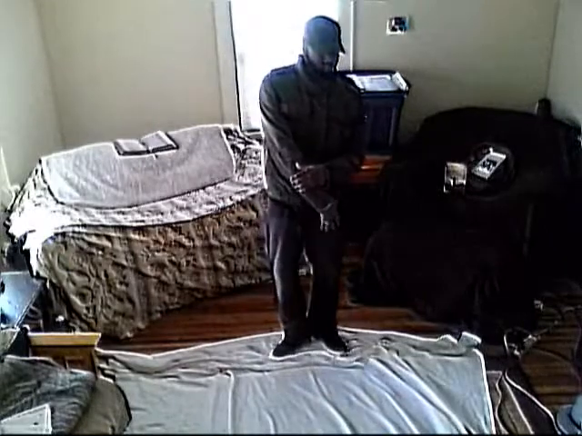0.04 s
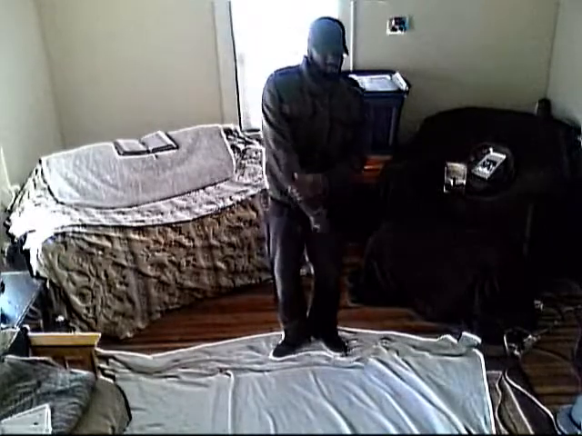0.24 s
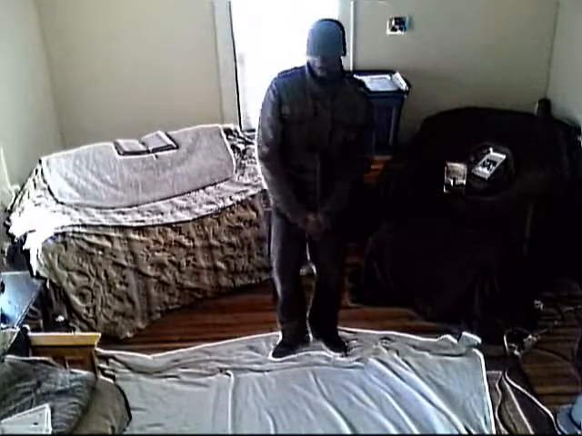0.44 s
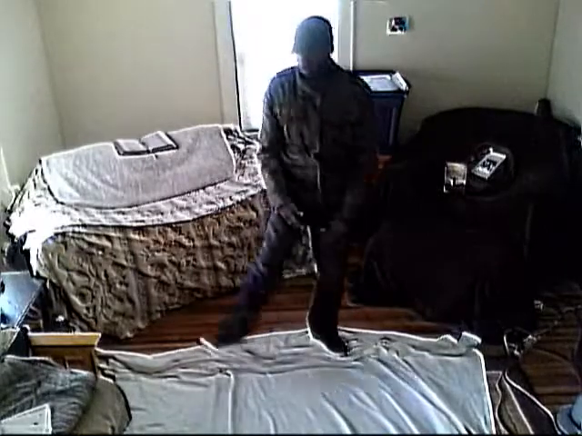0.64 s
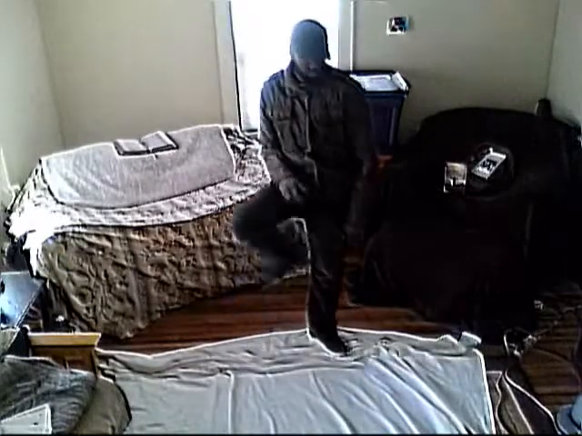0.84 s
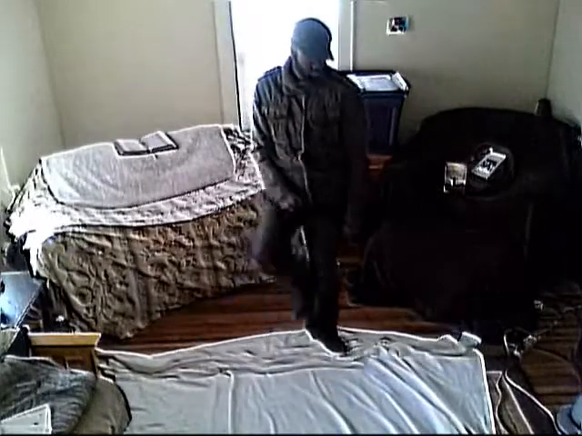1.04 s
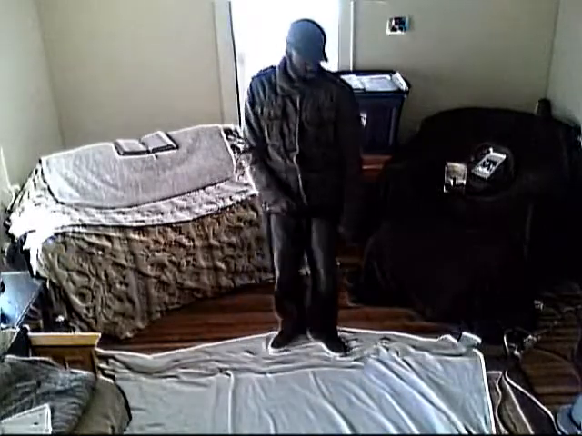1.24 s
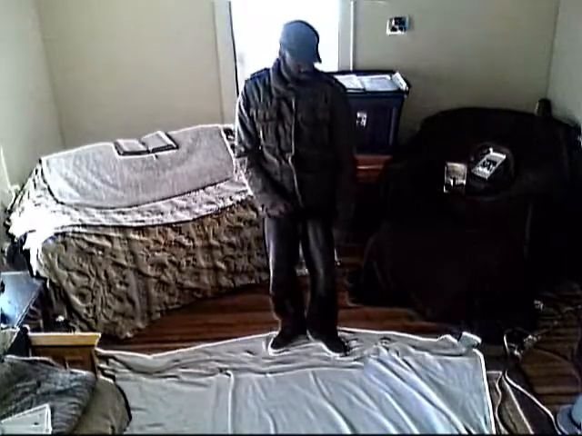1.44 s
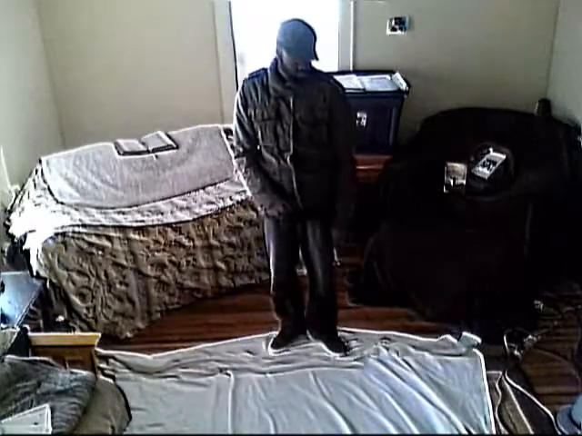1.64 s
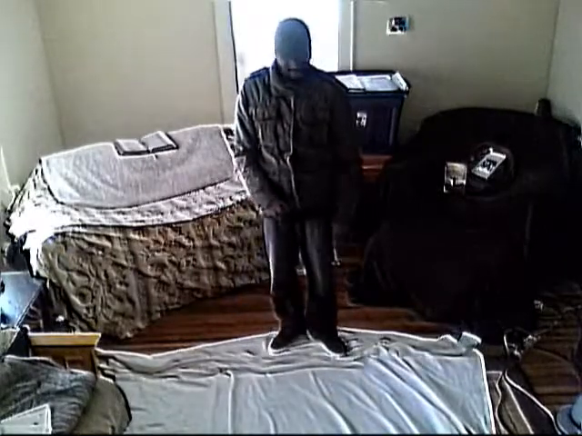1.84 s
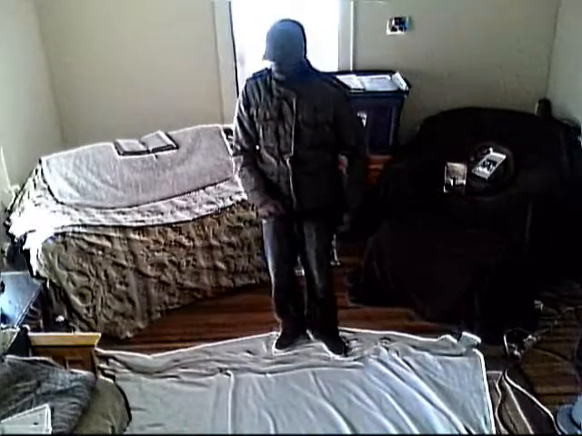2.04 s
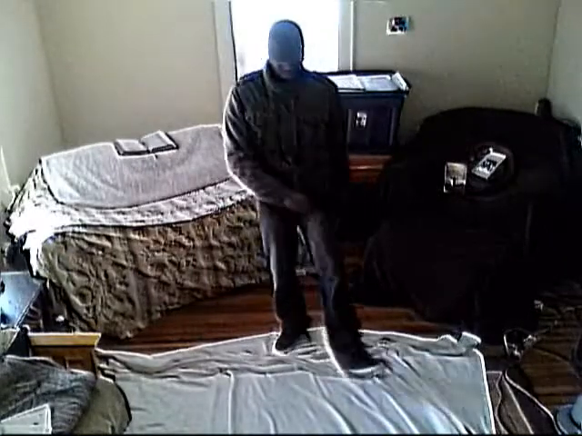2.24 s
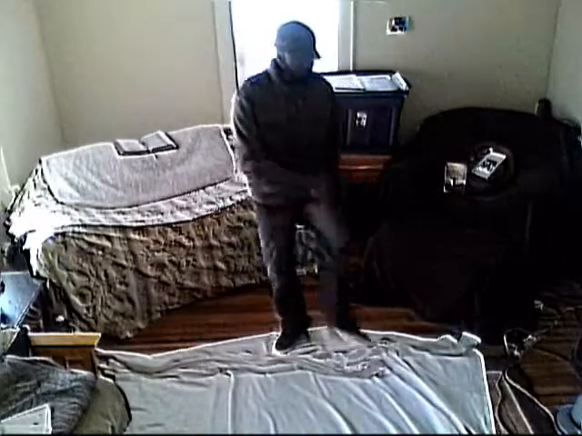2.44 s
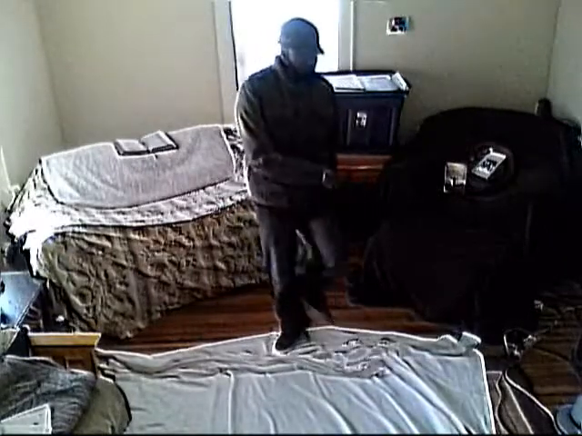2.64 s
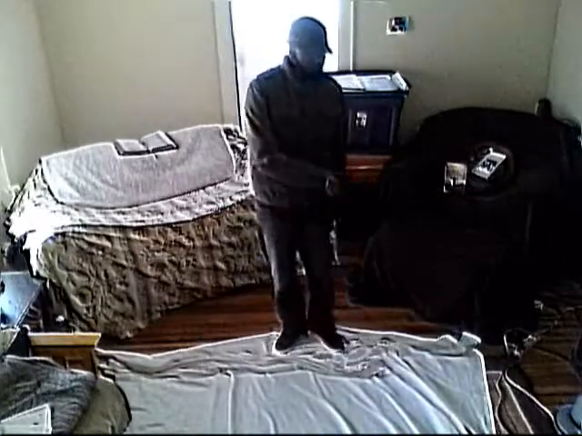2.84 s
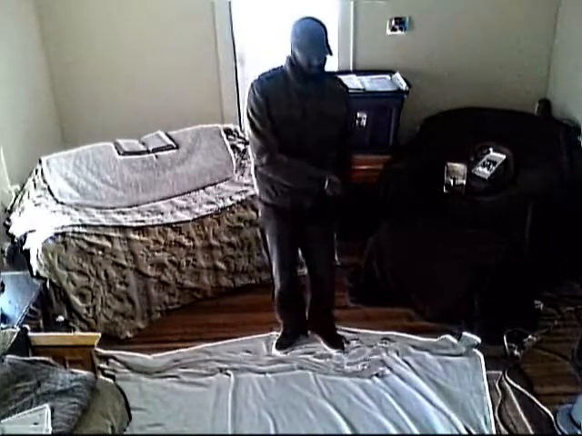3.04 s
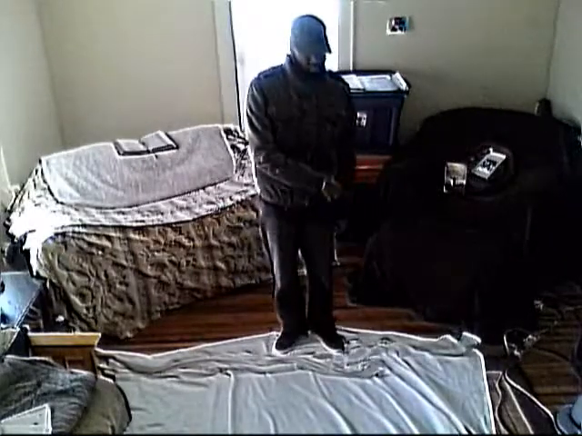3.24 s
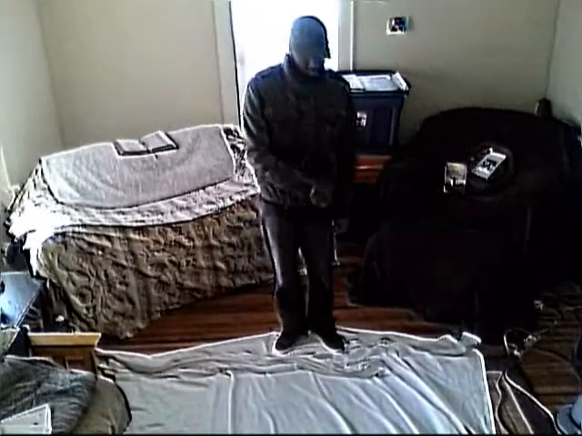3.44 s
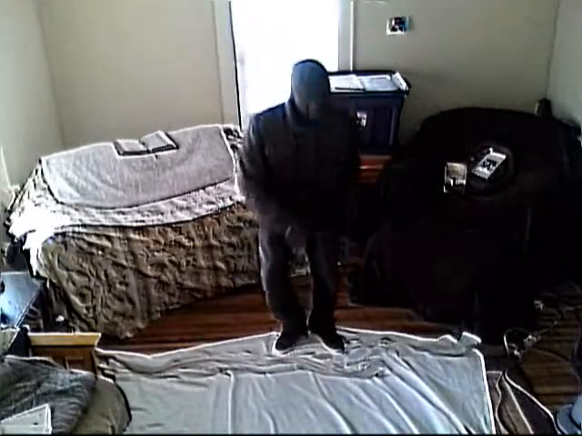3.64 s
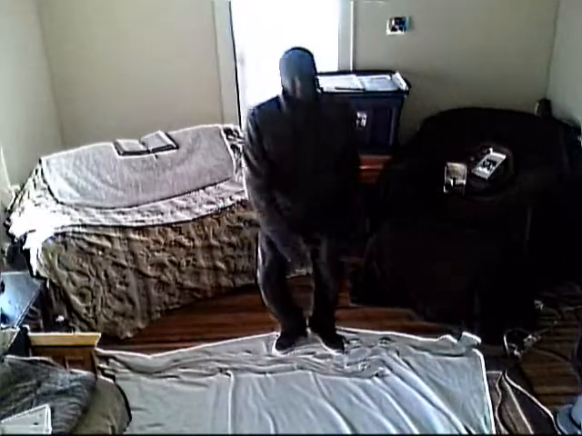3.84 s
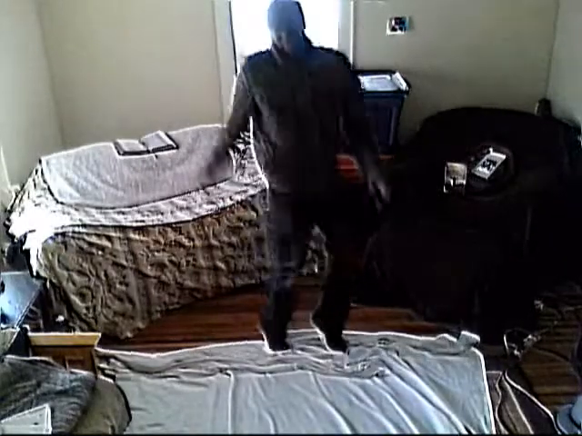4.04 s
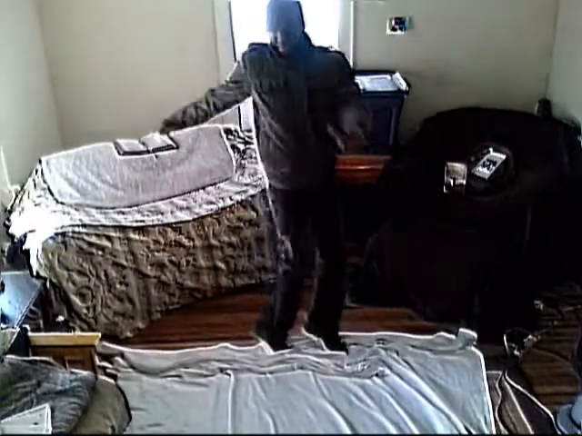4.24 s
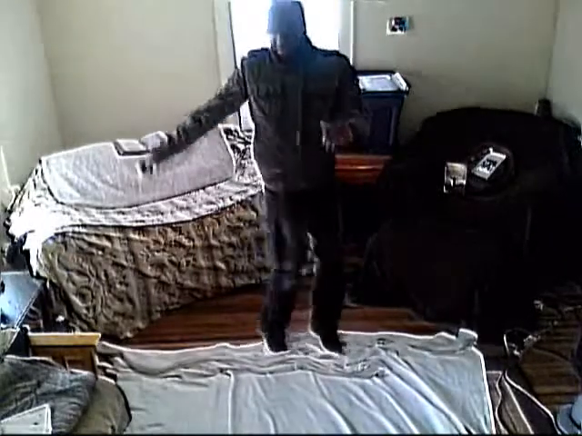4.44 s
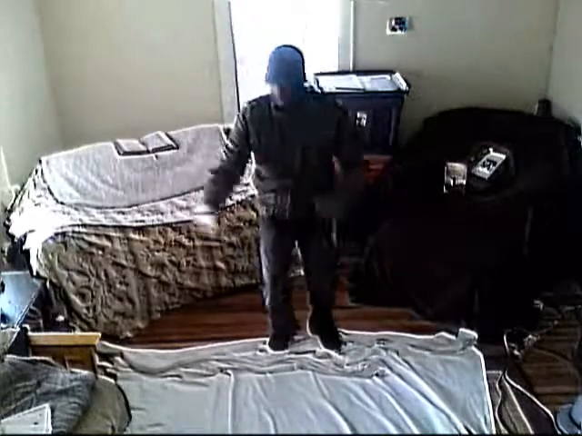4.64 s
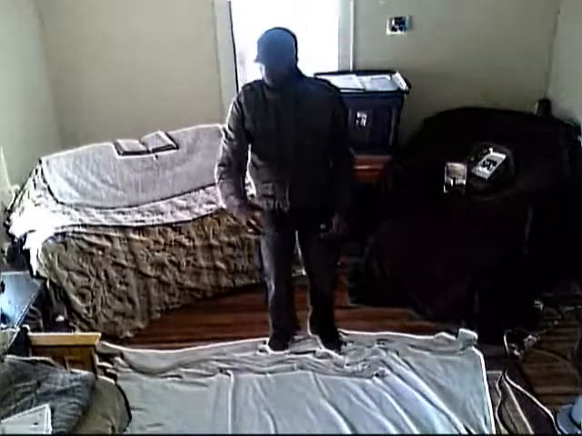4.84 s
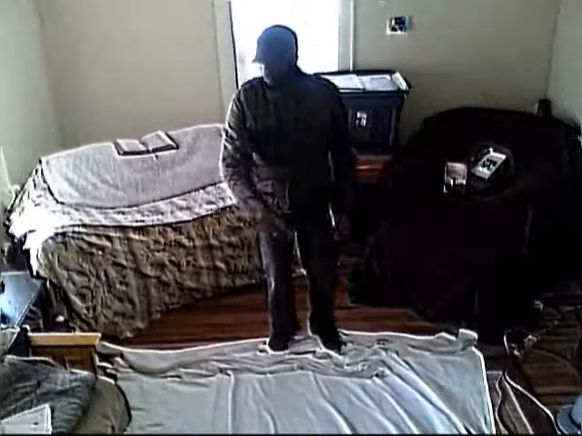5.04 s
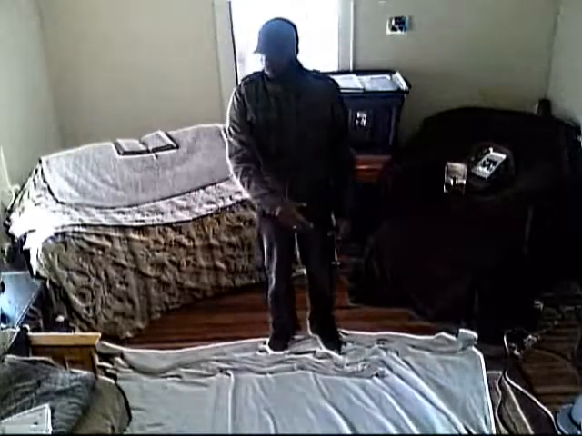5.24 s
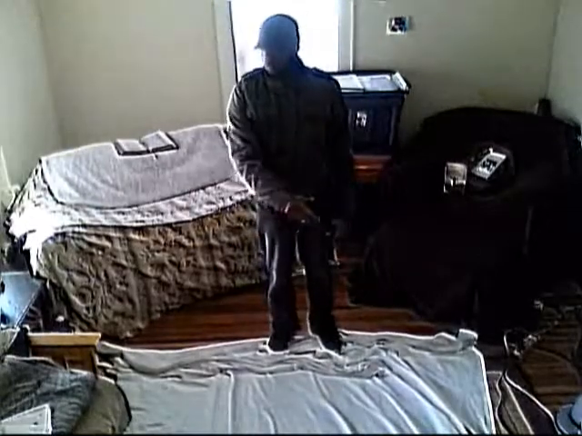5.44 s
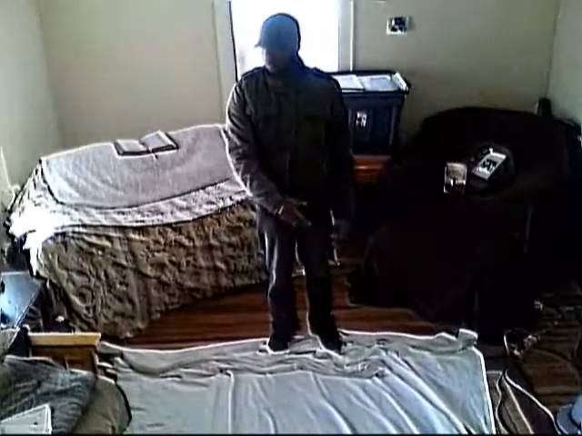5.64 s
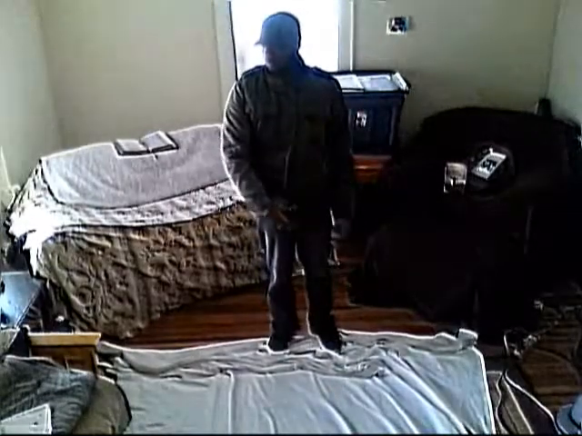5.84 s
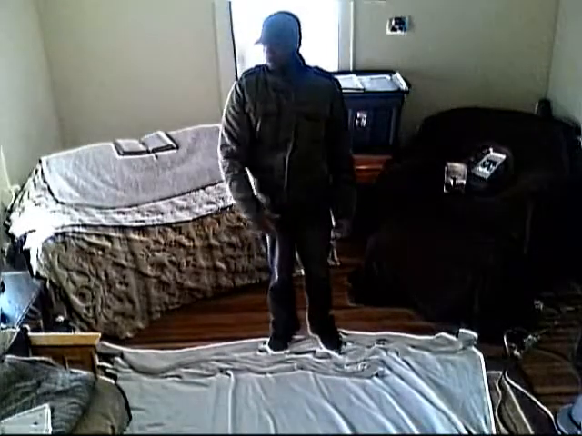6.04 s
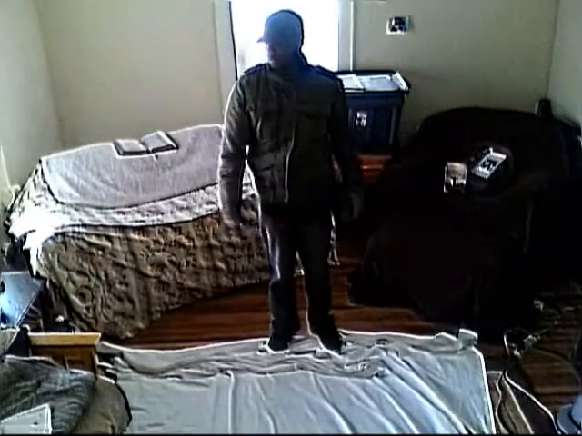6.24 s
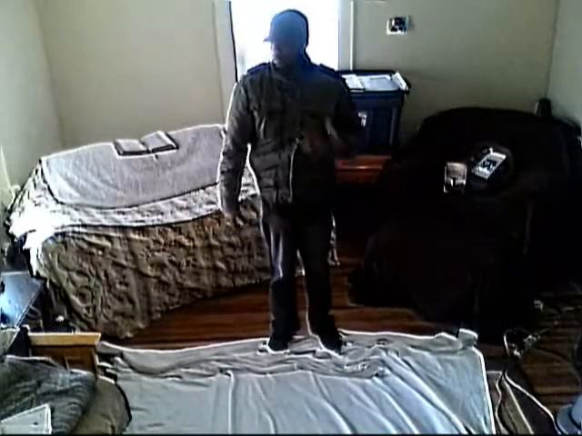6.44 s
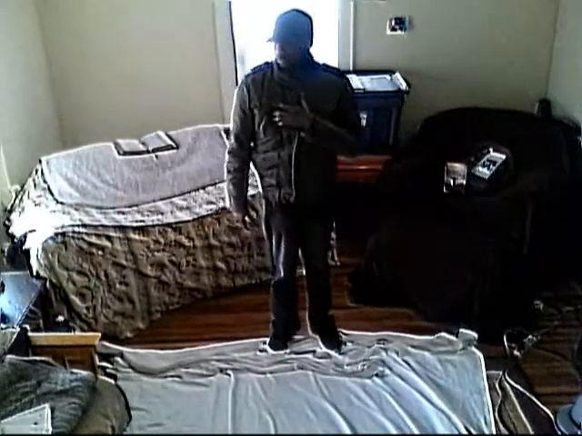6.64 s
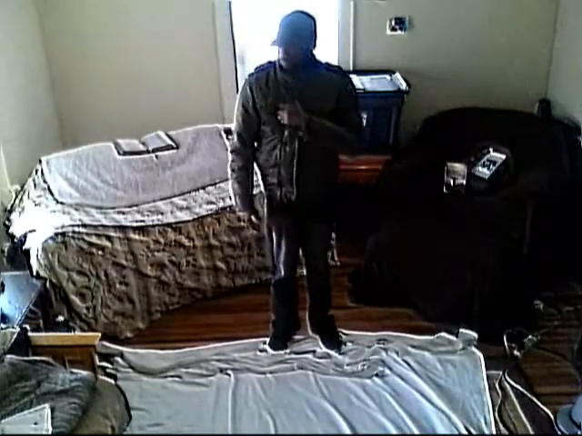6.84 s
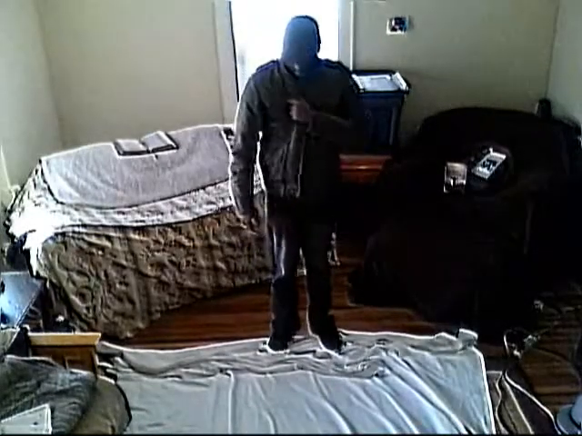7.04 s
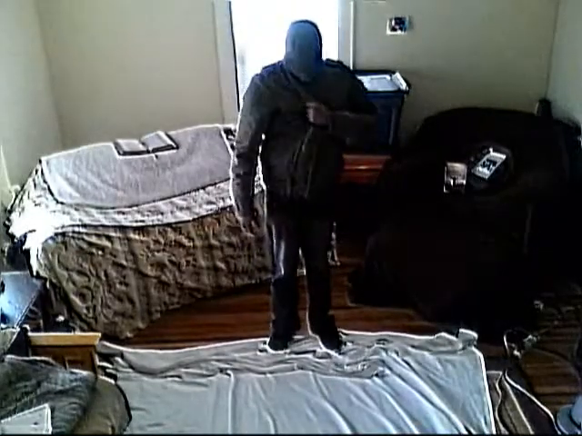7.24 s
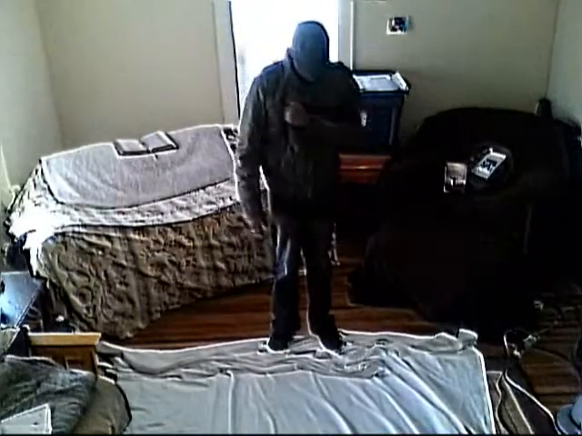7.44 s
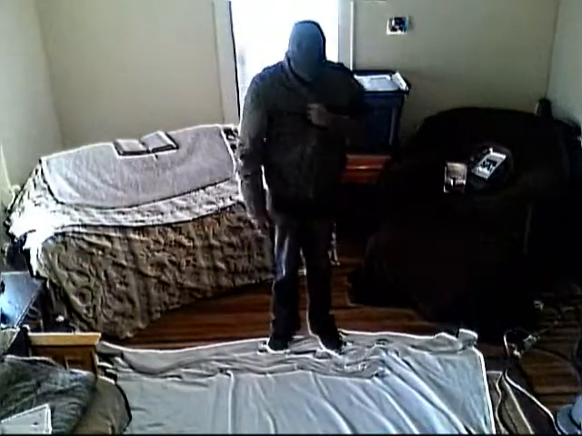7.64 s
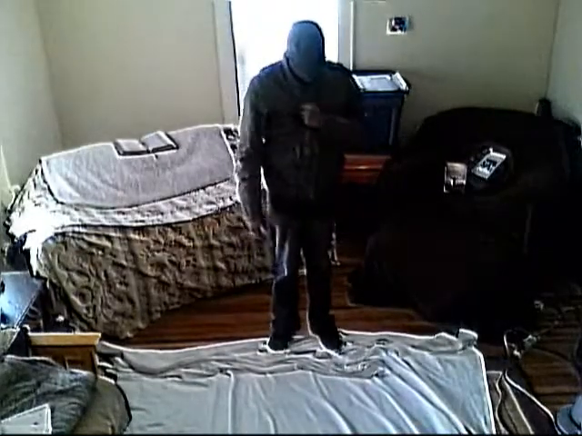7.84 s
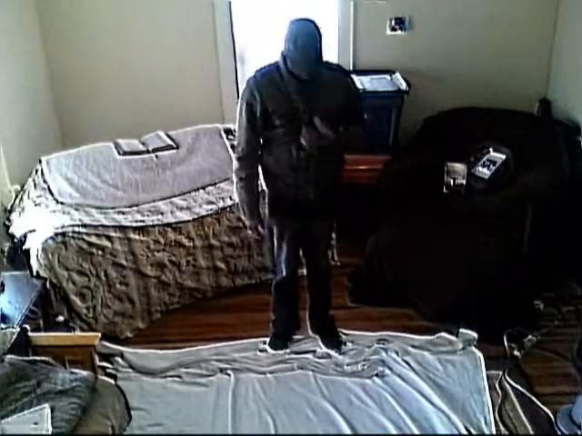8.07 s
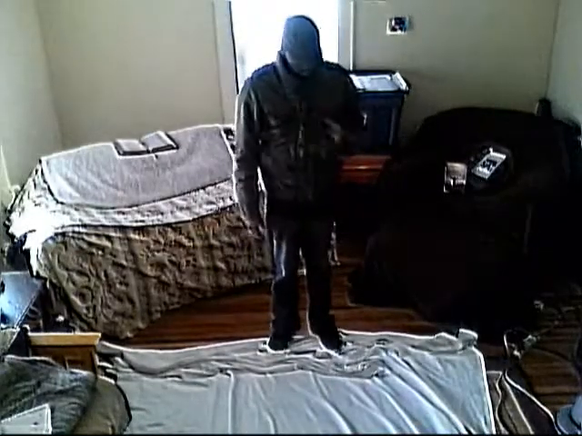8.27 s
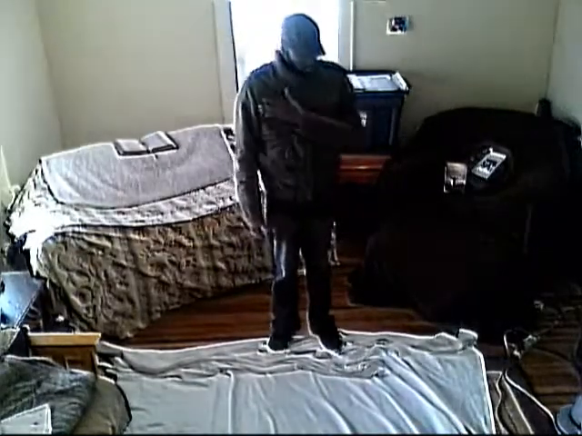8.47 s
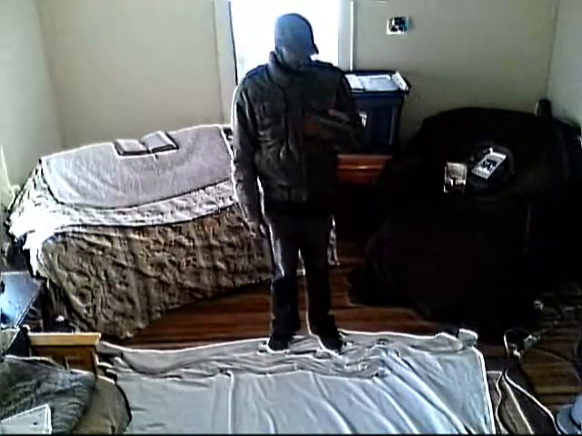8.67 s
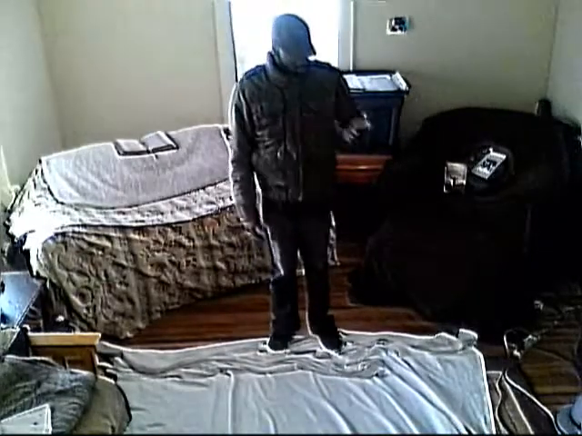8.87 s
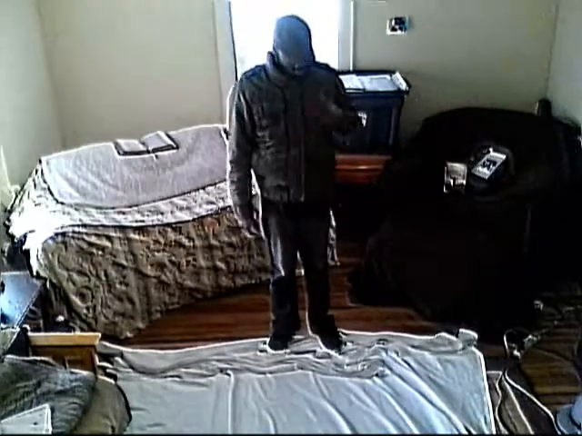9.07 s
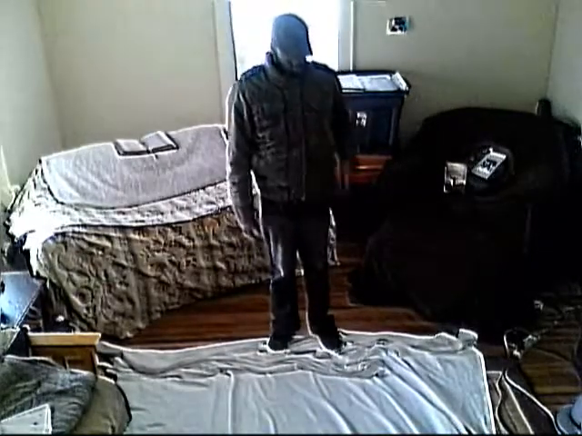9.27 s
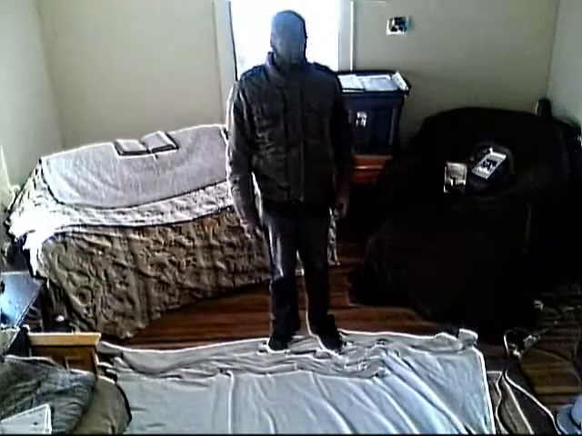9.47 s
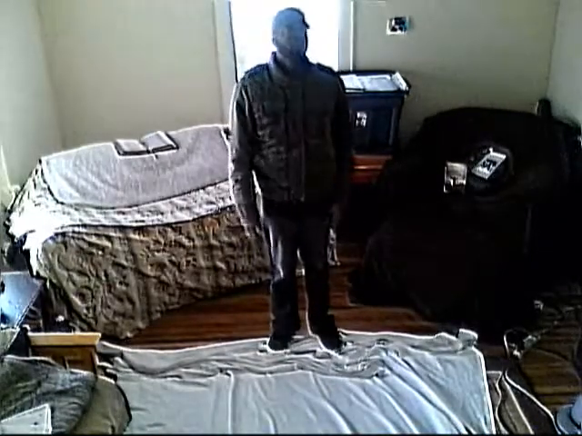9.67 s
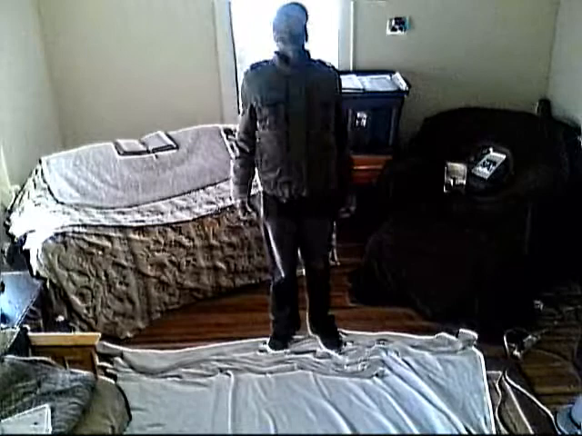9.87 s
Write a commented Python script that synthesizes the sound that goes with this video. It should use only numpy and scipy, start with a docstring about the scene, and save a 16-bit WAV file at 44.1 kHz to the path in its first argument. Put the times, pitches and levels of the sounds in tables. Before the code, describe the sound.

A small bedroom with a quiet, steady fan: low rumble, faint hum and wavering airy whir. At the start an earlier stomp fades in low floor tones; clothes swish softly from 0.4 s, with a faint jacket pat near 0.8 s. At 1.2 s a foot stomps on the sheet-covered wooden floor: a huge deep thud, quick boomy knocks and a loose board ringing briefly. Soft bumps and rustles follow, and a dull pat at 2.5 s. At 2.8 s comes a lower, softer stomp. Cloth sweeps around 3.9-4.2 s, then the hardest landing at 4.6 s, with a sharp shoe clack and a deep, overloaded boom decaying into rumble. Afterwards there are only slight floor bumps and rustling. Muffled jacket pats come at 6.3, 6.8-6.9 and 7.7 s, then crisp, snapping slaps at 8.5 and 9.0 s, the latter with a fuller chest thud. A faint swish ends it near 9.9 s.

```python
"""An earlier stomp dies away while a small fan whirs and clothes swish; a light pat on the jacket follows.
Then a dancer stomps three times on a sheet-covered wooden floor in a small bedroom, and pats and slaps his jacket.
Stomps are decaying floor tones plus shaped noise; slaps are noise bursts plus chest, room and cloth tones.
Clothes are noise that swells with each movement; shifts of weight bump the floor; the fan is steady noise and hum.
The nearby microphone overloads on the heaviest heaves, which flattens the wave."""
import sys
import numpy as np
from scipy import signal
from scipy.fft import rfft, irfft, next_fast_len
from scipy.io import wavfile
from scipy.ndimage import uniform_filter1d

SR = 44100
rng = np.random.default_rng(int(sys.argv[2]) if len(sys.argv) > 2 else 0)


def persist_wave(psi):
    """Save psi, clipped to +-1, as 16-bit WAV."""
    counts = np.round(np.clip(psi, -1, 1) * 32767).astype(np.int16)
    wavfile.write(sys.argv[1], SR, np.atleast_2d(counts).T)


N = 437031
TIME = np.arange(N) / SR
TAIL = TIME[:SR]   # one second, the length of each single sound
CUTOFF_HZ = 15600   # top of the sound
# how much the tones vary from blow to blow
CRACK_SPREAD_DB, JOIST_SPREAD_DB, MODE_SPREAD_DB = 1.0, 1.5, 3.0


# In all tables t60 is the time a tone takes to fall by 60 dB.
# Contacts of heel, sole and body weight: (time [s], heave of the joists [dB], their pitch under load [ratio],
# boom of the boards [dB], top of the boom, higher when harder [Hz], clack of the shoe [dB],
# ring of the loose board [dB], damping by the planted foot, none if negative [dB per s])
STOMP_CONTACTS = [(1.2315, 10, 0.96, -20.5, 348, -42.5, -43, 3.5),
                  (1.240, -23, 0.92, -16.5, 290, -46, -28, 58.5),
                  (1.2577, -7, 0.92, -11.5, 380, -46.5, -18.5, 70),
                  (1.277, -22, 0.77, -15.5, 280, -55.5, -17.5, 48),
                  (1.293, -22.5, 1, -15.5, 250, -60, -31, 68.5),
                  (1.3187, 0.5, 0.95, -14, 290, -43, -17, 70), (1.356, -22, 1, -21, 230, -51, -28.5, 39.5),
                  (1.415, -12, 0.9, -19.5, 170, -51, -32, -3), (1.572, -27, 0.9, -35, 300, -71, -46, -5),
                  (2.805, 0, 0.79, -20, 200, -43, -50, 20), (2.8126, -23, 0.72, -18, 200, -45, -50, 13),
                  (2.828, -10, 1, -27, 200, -56, -50, 22), (2.849, 1, 0.94, -21, 216, -64, -48, 28),
                  (2.877, -9, 0.93, -20, 216, -68, -45, -2),
                  (4.6051, 10.5, 0.93, -17.5, 450, -34.5, -40, 6),
                  (4.6144, -26, 1, -15.5, 450, -30.5, -36, 12),
                  (4.632, -13, 0.62, -15.5, 450, -32.5, -29, 5),
                  (4.655, -21, 0.9, -19.5, 400, -35, -36, 12), (4.693, -10, 0.52, -18.5, 340, -41, -31, 0),
                  (4.785, -22, 0.62, -24.5, 300, -46, -50, 0),
                  (4.882, -14.5, 0.19, -30.5, 600, -63, -50, 0)]
# Lowest bending tones of the floor, before the load retunes them: (pitch [Hz], level [dB], t60 [s])
JOIST_MODES = [(23.94, -8.5, 0.49), (32.85, 5, 0.21), (38.7, -25, 1), (51.7, -9, 0.31)]
# Tones of boards and room: (pitch [Hz], relative level [dB], t60 [s])
BOARD_MODES = [(88.8, -2, 0.32), (100.54, -9, 0.71), (115.5, -6.5, 0.46), (154.3, -11, 0.46),
               (168, -19, 0.28), (235.5, -10.5, 0.56), (284.9, -5, 0.41), (311, -14, 0.49),
               (357.5, -16, 0.62), (515, -25.5, 0.36), (686, -26, 0.62)]
# Dense ringing of the floor: (frequency [Hz], relative level [dB per Hz])
BOOM_SPECTRUM = [(30, -12), (70, -3.5), (150, -6), (300, -9.5), (400, -16), (600, -28), (1200, -52.5),
                 (4000, -61), (15000, -68)]
# Dense ringing of the shoe: (frequency [Hz], relative level [dB per Hz])
CLACK_SPECTRUM = [(100, -27), (400, 13.5), (800, 6), (1300, 7.5), (2200, -13), (2900, -31), (6000, -36),
                  (15000, -58)]
# Ringing of a struck board: (pitch [Hz], relative level [dB], t60 [s])
KNOCK_MODES = [(491, -3, 0.19), (990, 10.5, 0.04), (1197, -15.5, 0.22), (1290, -12, 0.14), (1370, -8, 0.35),
               (1960, -17, 0.28), (2100, -8, 0.094)]
# One board that rings on when the foot lands on it: (pitch [Hz], relative level [dB], t60 [s])
LOOSE_BOARD_MODES = [(198.3, -1, 0.3), (289.5, -7.5, 0.32)]


def stomps(modes_db=-5.0, dense_db=-8.5, press_s=0.021, sole_s=0.00031, knock_db=-5.0, loose_s=0.004):
    """Each contact of a landing bends the joists, rings the boards and clacks through the sheet."""
    out = np.zeros(N)
    for s, heave_db, tuning, boom_db, top_hz, clack_db, loose_db, damping_db in STOMP_CONTACTS:
        heave = ring(JOIST_MODES, JOIST_SPREAD_DB, tuning) * (1 - np.exp(-TAIL / press_s)) ** 2

        dense = coloured(impact(direct_db=12.5, contact_s=0.0045, build_s=0.0021), BOOM_SPECTRUM)
        boom = from_db(modes_db) * ring(BOARD_MODES, MODE_SPREAD_DB) + from_db(dense_db) * dense
        boom = boom * (1 - np.exp(-TAIL / sole_s))   # the soft sole rounds the attack
        boom = low_pass(boom, 1, top_hz)

        clack = coloured(impact(direct_db=2.0, contact_s=0.0083, build_s=0.011), CLACK_SPECTRUM)
        clack += from_db(knock_db) * ring(KNOCK_MODES, MODE_SPREAD_DB)

        floor = from_db(heave_db) * heave + from_db(boom_db) * boom + from_db(clack_db) * clack
        damping = from_db(-max(damping_db, 0) * TAIL)
        loose = ring(LOOSE_BOARD_MODES, JOIST_SPREAD_DB) * (1 - np.exp(-TAIL / loose_s))
        add(out, s, floor * damping + from_db(loose_db) * loose)
    return out


# Short dry ticks and clicks of boards, shoe, cloth, light pats and microphone overload:
# (time [s], level [dB], centre [Hz], fall to both sides [dB per octave])
DRY_TICKS = [(1.238, -36.5, 2000, 54.5), (1.243, -43.5, 3300, 22.5), (1.2596, -27.5, 800, 19),
             (2.805, -36, 2300, 17), (4.609, -35, 2040, 57), (4.616, -25.5, 1050, 28),
             (4.697, -46, 4200, 20), (6.7095, -44, 2460, 55), (6.708, -41, 4660, 36),
             (6.937, -35, 1190, 13.5)]


def ticks(decay_s=0.0023):
    """Short dry ticks and clicks: brief noise bursts, each narrowed around its own centre."""
    out = np.zeros(N)
    for s, db, centre_hz, focus_db in DRY_TICKS:
        burst = rng.standard_normal(SR) * np.exp(-TAIL / decay_s)
        spectrum = focused([(centre_hz, 0)], centre_hz, focus_db, flat_octaves=0.038)
        add(out, s, from_db(db) * coloured(burst, spectrum))
    return out


# Hand on jacket: (time [s], thud of the chest [dB], snap of the cloth before a common 2 dB cut [dB],
# centre of the snap [Hz], its fall to both sides [dB per octave], shaking of the jacket [dB])
JACKET_SLAPS = [(0.83, -48.5, -70, 700, 9, -62), (2.472, -44, -53, 515, 26, -60),
                (6.262, -60.5, -52.5, 1670, 53, -75), (6.757, -50, -45, 800, 42, -76),
                (6.800, -46.5, -47, 378, 30, -70), (6.817, -40.5, -40, 600, 12, -56),
                (6.829, -42.5, -47, 1500, 24, -68), (6.9361, -52, -37.5, 1390, 30, -62),
                (7.659, -41.5, -35.5, 930, 12, -75), (8.4726, -50, -45, 1300, 14, -55),
                (8.4756, -49, -23.5, 3400, 4, -30), (8.4815, -37, -27.5, 1900, 16.5, -35),
                (9.0108, -38, -31.5, 900, 11, -59), (9.0173, -23.5, -23, 2300, 2, -34),
                (9.0253, -29, -28.5, 900, -1, -46)]
# Dense sound of the chest: (frequency [Hz], relative level [dB per Hz])
CHEST_SPECTRUM = [(25, -10), (110, -2.5), (180, -6.5), (330, -3.5), (500, -3.5), (700, -4.5), (1100, -15.5),
                  (1700, -27), (3000, -26.5), (15000, -75)]
# Snap of the cloth, before it is narrowed: (frequency [Hz], relative level [dB per Hz])
SNAP_SPECTRUM = [(150, -30), (600, 7), (1700, 5.5), (2500, -2.5), (3300, -8), (5000, -8.5), (6500, -18.5),
                 (8500, -30), (12000, -80), (15500, -77)]
# Resonances of chest and room that a slap sets ringing: (pitch [Hz], relative level [dB], t60 [s])
CHEST_ROOM_MODES = [(156.3, 1, 0.34), (200, 6, 0.15), (307, -15, 0.25), (355, -15, 0.3), (423, -6, 0.56),
                    (502.7, 6, 0.17), (589, 0, 0.15), (700, -7, 0.63), (733, -8, 0.28), (910, -5.5, 0.41),
                    (1080, -4.5, 0.41), (1205, -23, 0.29), (1376, -10.5, 0.58), (1600, -7.5, 0.27),
                    (1950, -8.5, 0.19)]
# Hollow punch of the chest under the palm: (pitch [Hz], relative level [dB], t60 [s])
PUNCH_MODES = [(203, 0.5, 0.13), (331, 4, 0.061)]
# Sharp crack of the stiff cloth: (pitch [Hz], relative level [dB], t60 [s])
CRACK_MODES = [(2620, 5.5, 0.03), (3400, 5.5, 0.013), (4340, 1, 0.018), (5150, 5.5, 0.018),
               (5880, 6, 0.012), (6900, -2, 0.018)]


def slaps(echo_s=0.027, echo_db=-8.0, modes_db=-6.5, near_wall_s=0.00177, mirror=0.099,
          crack_db=3.5, hard_db=-21.5, crack_growth=1.7, crack_top_hz=7500):
    """The palm thuds on the chest and the cloth snaps; near surfaces return the snap at once."""
    out = np.zeros(N)
    for s, thud_db, snap_db, centre_hz, focus_db, _ in JACKET_SLAPS:
        snap = impact(direct_db=8.5, contact_s=0.0044, build_s=0.011)
        echo = rng.standard_normal(SR) * from_db(echo_db) * np.exp(-TAIL / 0.0046)
        add(snap, echo_s, echo)
        snap = coloured(snap, focused(SNAP_SPECTRUM, centre_hz, focus_db, flat_octaves=0.37))
        snap = reflected(snap, near_wall_s, mirror)

        crack = low_pass(ring(CRACK_MODES, CRACK_SPREAD_DB), 4, crack_top_hz)
        # the crack gains more than the snap as slaps get harder
        snap += from_db(crack_db + crack_growth * (snap_db - hard_db)) * crack

        thud = coloured(impact(direct_db=-1.0, contact_s=0.032, build_s=0.0052), CHEST_SPECTRUM)
        thud += from_db(modes_db) * ring(CHEST_ROOM_MODES, MODE_SPREAD_DB)
        thud += ring(PUNCH_MODES, MODE_SPREAD_DB)
        add(out, s, from_db(snap_db - 2.0) * snap + from_db(thud_db) * thud)
    return out


# Swings of sleeve or trouser leg and scuffs of a sole; the first row is an earlier stomp dying away:
# (time [s], level [dB], swell [s], fade [s], centre [Hz], fall to both sides [dB per octave], flapping [dB])
CLOTH_SWISHES = [(0.028, -87, 0.083, 0.21, 1500, 6, -56.5), (0.26, -78, 0.025, 0.033, 1500, 4, -50.5),
                 (0.42, -53.5, 0.08, 0.15, 4020, 6, -60), (0.591, -49.5, 0.066, 0.065, 2000, 0.5, -65),
                 (0.90, -52, 0.087, 0.078, 6040, 3.5, -69), (1.125, -36, 0.0081, 0.021, 4370, 9.5, -41),
                 (1.142, -43, 0.018, 0.025, 1600, 9, -41), (1.099, -51, 0.042, 0.14, 1100, -0.5, -43.5),
                 (2.259, -55, 0.059, 0.23, 4500, -0.5, -51.5), (2.631, -58.5, 0.028, 0.045, 5000, 16, -60),
                 (2.788, -41, 0.014, 0.031, 1240, 9, -51), (2.809, -40, 0.0071, 0.047, 2320, 10.5, -41.5),
                 (3.87, -46, 0.077, 0.071, 3770, 16, -83), (3.90, -46, 0.12, 0.065, 970, 10, -93),
                 (4.10, -55.5, 0.078, 0.069, 6000, 6, -57), (4.14, -59, 0.057, 0.059, 700, 1, -48.5),
                 (4.21, -51.5, 0.12, 0.067, 4970, 0.5, -52), (4.602, -56.5, 0.13, 0.15, 4140, 7, -59),
                 (4.68, -48, 0.017, 0.067, 2600, 6, -58), (4.699, -43.5, 0.005, 0.018, 4100, 6.5, -65),
                 (6.695, -48.5, 0.059, 0.042, 1450, 23, -56), (6.713, -52.5, 0.0047, 0.061, 4660, 10, -64),
                 (7.20, -48.5, 0.043, 0.062, 7000, 4, -46), (7.462, -52, 0.026, 0.053, 4130, 5, -43),
                 (7.695, -46.5, 0.029, 0.047, 7900, 1.5, -41.5), (8.464, -54, 0.012, 0.013, 1400, 2, -42),
                 (9.868, -52, 0.051, 0.045, 4000, 3, -47)]
# Hiss of the threads, before it is narrowed: (frequency [Hz], relative level [dB per Hz])
HISS_SPECTRUM = [(600, 4.5), (1500, 10), (2300, 8), (3000, 2.5), (4300, 2.5), (6500, -1), (8500, -6.5),
                 (11000, -19.5), (15500, -36.5)]
# Flapping of the folds: (frequency [Hz], relative level [dB per Hz])
FLAP_SPECTRUM = [(120, -11), (300, -3.5), (550, -2), (1100, -8.5), (1700, -11.5), (2800, -35), (6000, -34),
                 (15000, -57)]
# A slapped jacket swishes briefly; its flapping is relative to the shaking.
SHAKE_SWELL_S, SHAKE_FADE_S, SHAKE_HZ, SHAKE_FOCUS_DB, SHAKE_FLAP_DB = 0.0022, 0.03, 4300, 3.5, -2
# Just before a slap the hand meets the loose cloth; levels are relative to the shaking.
BRUSH_LEAD_S, BRUSH_S, BRUSH_DB = 0.00244, 0.015, -23
BRUSH_HZ, BRUSH_FOCUS_DB, BRUSH_FLAP_DB = 1300, 4, -15.5


def clothes(grain_db=0.9, grain_rate=260, fold_db=0.75, fold_rate=45, roundness=1.05,
            mirror=0.24, patch_db=3.0, patch_rate=35):
    """Each movement speeds up and slows down; threads catch and hiss, and folds flap as they turn over."""
    hiss, flap = np.zeros(N), np.zeros(N)
    lead_s = .35   # room for the swell before the fastest moment
    shakes, brushes = [], []
    for s, *_, db in JACKET_SLAPS:
        shakes.append((s, db, SHAKE_SWELL_S, SHAKE_FADE_S, SHAKE_HZ, SHAKE_FOCUS_DB, db + SHAKE_FLAP_DB))
        brushes.append((s - BRUSH_LEAD_S, db + BRUSH_DB, BRUSH_S, BRUSH_S,
                        BRUSH_HZ, BRUSH_FOCUS_DB, db + BRUSH_FLAP_DB))
    for s, db, swell_s, fade_s, centre_hz, focus_db, flapping_db in CLOTH_SWISHES + shakes + brushes:
        distance = np.maximum((lead_s - TAIL) / swell_s, (TAIL - lead_s) / fade_s)
        speed = np.exp(-distance ** roundness)
        spectrum = focused(HISS_SPECTRUM, centre_hz, focus_db, flat_octaves=0.06)
        add(hiss, s - lead_s, from_db(db) * speed * coloured(rubbing(), spectrum))
        add(flap, s - lead_s, from_db(flapping_db) * speed)
    catching = from_db(grain_db * drift(grain_rate) + fold_db * drift(fold_rate))
    cloth = patchy(hiss, patch_db, patch_rate) + flap * noise(FLAP_SPECTRUM)
    return reflected(catching * cloth, .00295, mirror)


def rubbing(crinkles_per_s=1600, crinkle_db=-5, spread_db=3.5):
    """One second of cloth on cloth: smooth friction and the tiny snaps of creases, at rms 1."""
    sizes = from_db(spread_db * np.minimum(rng.exponential(1, SR), 4)) * rng.choice([-1, 1], SR)
    crinkles = sizes * (rng.random(SR) < crinkles_per_s / SR)
    return rms_one(rng.standard_normal(SR) + from_db(crinkle_db) * rms_one(crinkles))


def patchy(x, depth_db, rate):
    """Folds of different sizes come and go: each third of an octave wavers on its own."""
    size = next_fast_len(N)
    bins = rfft(x, size)
    hz = np.arange(len(bins)) * SR / size
    band = 3 * np.log2(np.clip(hz / 1000, 1, 8))   # thirds of an octave above 1 kHz
    out = np.zeros(N)
    for k in range(10):
        part = irfft(bins * np.maximum(1 - abs(band - k), 0), size)[:N]
        out += part * from_db(depth_db * drift(rate))
    return out


# Clearest low bumps: the first is an earlier stomp dying away, the rest shifts of weight:
# (time [s], heave of the joists [dB], bump of the boards, before a 4 dB cut of their tones [dB])
LOW_BUMPS = [(0.005, -21, -22.5), (0.125, -23.5, -28.5), (0.241, -28, -27), (1.081, -26.5, -22.5),
             (1.775, -25.5, -28.5), (2.109, -21.5, -27), (2.228, -22, -26), (2.262, -23.5, -26.5),
             (2.32, -41, -31.5), (2.540, -30, -28), (3.124, -26.5, -26), (3.489, -55, -23.5),
             (3.61, -38, -23), (4.332, -25.5, -31), (4.568, -36, -25), (4.969, -24, -22), (5.233, -36, -25),
             (5.58, -38, -26), (6.378, -37, -30), (6.527, -34, -26), (6.744, -49, -27.5),
             (6.798, -47, -27.5), (9.246, -50, -29), (9.424, -47, -26), (9.6, -40, -54), (9.779, -26, -33)]


def low_bumps(press_s=0.013, soft_hz=150, dense_db=-6.0, dense_t60=0.34):
    """Floor tones with a slow onset, as when weight rolls on to a foot, so mostly the low ones answer."""
    out, dense = np.zeros(N), np.zeros(N)
    press = 1 - np.exp(-TAIL / press_s)
    for s, heave_db, boards_db in LOW_BUMPS + sways():
        heave = from_db(heave_db) * ring(JOIST_MODES, JOIST_SPREAD_DB, rng.uniform(0.99, 1.1))
        boards = from_db(boards_db - 4.0) * ring(BOARD_MODES, spread_db=4.0)
        add(out, s, press * (heave + boards))
        add(dense, s, press * from_db(boards_db + dense_db - 60 * TAIL / dense_t60))
    return low_pass(out + dense * noise(BOOM_SPECTRUM), 2, soft_hz)


def sways(per_s=4.0, level_db=-37.5, spread_db=3):
    """Fainter bumps at loosely even times as he keeps his balance, as rows like those of LOW_BUMPS."""
    rows = []
    for k, (late, deep, high) in enumerate(rng.standard_normal((60, 3))):
        beat = k + .3 * late
        if beat < per_s * N / SR:
            rows.append((beat / per_s, level_db + spread_db * deep, level_db + spread_db * high))
    return rows


# Fan and room rumble: (frequency [Hz], relative level [dB per Hz])
FAN_SPECTRUM = [(15, -8.5), (33, -7), (50, 5), (72, -10), (102, -3), (140, -2), (180, -17), (260, -15.5),
                (350, -19.5), (460, -23.5), (1000, -24.5), (1700, -38), (3500, -36.5), (8000, -46.5)]
# Resonances of the fan's casing: (centre [Hz], width [Hz], level before a common cut and wavering [dB])
CASING_WHIR = [(1377, 300, -56.5), (1675, 100, -61), (2064, 400, -63), (2923, 330, -66.5)]
# Fan hum and a faint electrical whistle: (pitch [Hz], level before a common cut [dB])
FAN_HUM = [(102.3, -53.5), (258.4, -56.5), (344.5, -63), (8000, -82)]


def fan(air_db=-45.0, top_hz=9300, waver_db=1.5, waver_rate=13, flutter_db=4.0, flutter_rate=20,
        whir_cut_db=-4.0, hum_cut_db=-1.0):
    """Rumble and air noise, casing resonances that waver at random and a faint hum."""
    out = from_db(air_db) * low_pass(noise(FAN_SPECTRUM), 4, top_hz)
    swell_db = waver_db * drift(waver_rate)   # shared by all resonances
    for hz, width, db in CASING_WHIR:
        band = signal.butter(2, [hz - width / 2, hz + width / 2], "band", fs=SR, output="sos")
        casing = rms_one(signal.sosfilt(band, rng.standard_normal(N)))
        out += from_db(db + whir_cut_db + swell_db + flutter_db * drift(flutter_rate)) * casing
    for hz, db in FAN_HUM:
        tone = np.sqrt(2) * np.sin(2 * np.pi * hz * TIME + 0.89 * drift(4.2))   # rms 1, wandering phase
        out += from_db(db + hum_cut_db) * tone
    return out


def impact(direct_db, contact_s, build_s):
    """A short direct burst followed by the room, whose reflections build up."""
    direct = from_db(direct_db) * rng.standard_normal(SR) * np.exp(-TAIL / contact_s)
    return direct + diffuse() * (1 - np.exp(-TAIL / build_s))


# How long the room rings: (frequency [Hz], t60 [s])
ROOM_DECAY = [(60, 1), (200, 0.37), (500, 0.42), (1500, 0.34), (4000, 0.33), (12000, 0.5)]


def diffuse(ripple_db=3.5, ripple_hz=25):
    """Dense reflections: noise that dies at its own pace in each octave, with random peaks and dips."""
    bins = rfft(rng.standard_normal(SR))
    hz = np.arange(len(bins))   # one second of sound, so bins lie 1 Hz apart
    knots = rng.standard_normal(len(bins))
    ripple = np.interp(hz / ripple_hz, np.arange(len(knots)), knots)
    bins = bins * rms_one(from_db(ripple_db * ripple))
    octave = np.round(np.log2(np.maximum(hz, 64)))
    out = np.zeros(SR)
    for k in np.unique(octave):
        out += irfft(bins * (octave == k), SR) * from_db(-60 * TAIL / at_hz(ROOM_DECAY, 2 ** k))
    return out


def ring(modes, spread_db, tuning=1):
    """Decaying tones after one blow; the place of the blow varies their strengths."""
    out = np.zeros(SR)
    for hz, db, t60 in modes:
        level = from_db(db + spread_db * rng.standard_normal() - 60 * TAIL / t60)
        out += level * np.sin(2 * np.pi * tuning * hz * TAIL)
    return out


def reflected(x, delay_s, gain):
    """A near surface adds a delayed copy and ripples the spectrum; power is kept."""
    n = np.arange(len(x))
    copy = np.interp(n - delay_s * SR, n, x, left=0)
    return (x + gain * copy) / np.sqrt(1 + gain ** 2)


def focused(spectrum, centre_hz, focus_db, flat_octaves):
    """Keep a spectrum flat_octaves to each side of a centre; beyond, it falls by focus_db per octave."""
    points = []
    for hz in np.geomspace(100, CUTOFF_HZ, 60):
        beyond = max(abs(np.log2(hz / centre_hz)) - flat_octaves, 0)
        points.append((hz, at_hz(spectrum, hz) - focus_db * beyond))
    return points


def coloured(x, spectrum):
    """Give x a spectrum with a causal (minimum-phase) filter of unit power gain."""
    size = 2 * next_fast_len(len(x) // 2 + SR // 10)
    gain = rms_one(from_db(at_hz(spectrum, np.linspace(0, SR / 2, size // 2 + 1))))
    cepstrum = irfft(np.log(gain))
    # folding the second half on to the first lets the filter answer only after its input
    cepstrum[1:size // 2] *= 2
    cepstrum[size // 2 + 1:] = 0
    return irfft(rfft(x, size) * np.exp(rfft(cepstrum)))[:len(x)]


def noise(spectrum):
    """Steady coloured noise, rms 1."""
    return rms_one(coloured(rng.standard_normal(N), spectrum))


def drift(rate):
    """A random wander with a spread near 1 that takes a new value `rate` times a second."""
    knots = rng.standard_normal(N // 100)
    return np.interp(TIME * rate, np.arange(len(knots)), knots)


def low_pass(x, order, top_hz):
    """Soften everything above top_hz."""
    return signal.sosfilt(signal.butter(order, top_hz, fs=SR, output="sos"), x)


def add(out, s, sound):
    """Mix a sound in at time s."""
    start = round(s * SR)
    sound, start = sound[max(-start, 0):], max(start, 0)
    out[start:start + len(sound)] += sound[:len(out) - start]


def from_db(db):
    """Decibels to gain."""
    return 10 ** (np.asarray(db) / 20)


def rms_one(x):
    """Scale to unit rms."""
    return x / np.sqrt(np.mean(x ** 2) + 1e-20)


def at_hz(points, hz):
    """Read a table on a log-frequency axis."""
    freqs, values = np.transpose(points)
    return np.interp(np.log(np.maximum(hz, 1)), np.log(freqs), values)


def scene():
    """Everything reaches one microphone."""
    return (stomps() + ticks() + slaps() + clothes() + low_bumps() + fan())[None]


# Two close tones that beat while the input is strained: (pitch [Hz], level at full strain [dB])
STRAIN_BUZZ = [(3880, -60), (3925, -55)]


def record(dry, ceiling=.9, block_hz=14, strain_full=0.5):
    """The input flattens the heaviest heaves, choking all else then; it blocks deep rumble and buzzes."""
    flattened = dry / (1 + (dry / ceiling) ** 20) ** (1 / 20)
    passed = signal.sosfilt(signal.butter(1, block_hz, "high", fs=SR, output="sos"), flattened)
    load = np.minimum(abs(dry) / strain_full, 1) ** 2
    strain = uniform_filter1d(load, size=300) ** 1.5   # smoothed over about 7 ms
    buzz = strain * sum(from_db(db) * np.sin(2 * np.pi * hz * TIME) for hz, db in STRAIN_BUZZ)
    top = signal.cheby2(12, 60, CUTOFF_HZ + 800, fs=SR, output="sos")   # steep cut of the highest treble
    return signal.sosfilt(top, np.clip(passed + buzz, -1, 1))


dry = scene()
out = record(dry)
persist_wave(out)
```